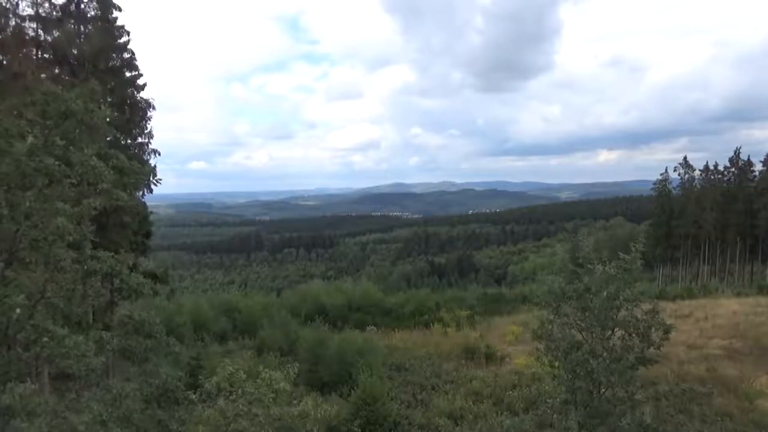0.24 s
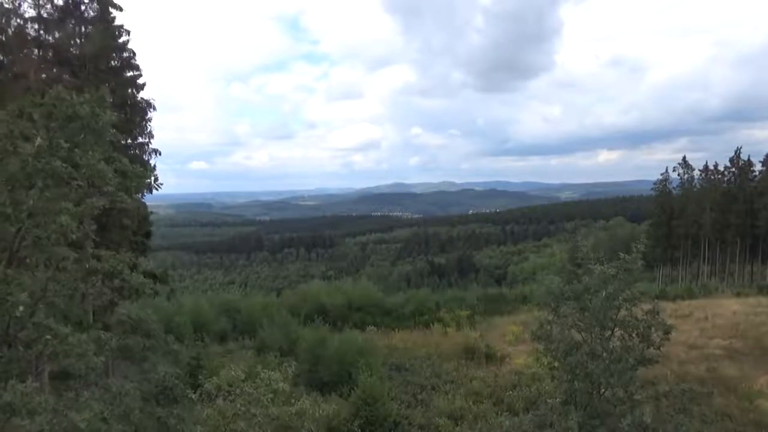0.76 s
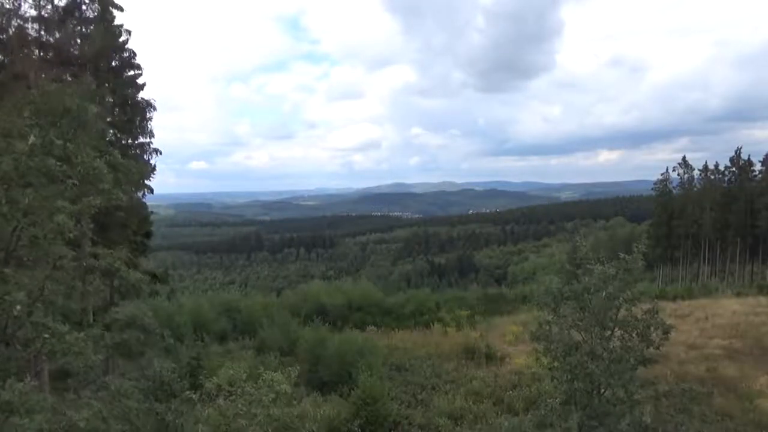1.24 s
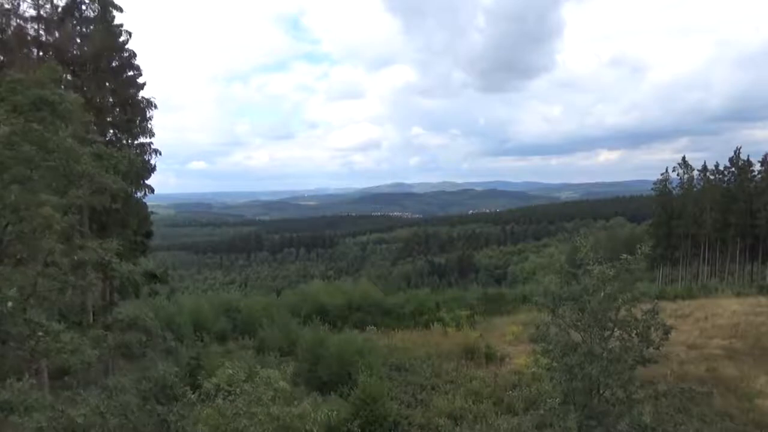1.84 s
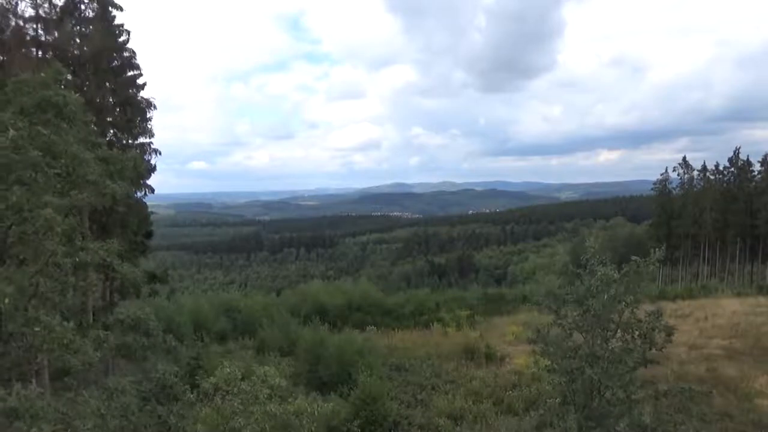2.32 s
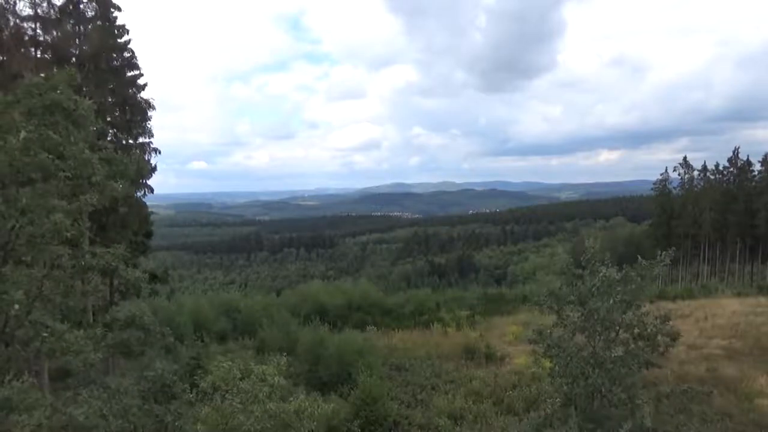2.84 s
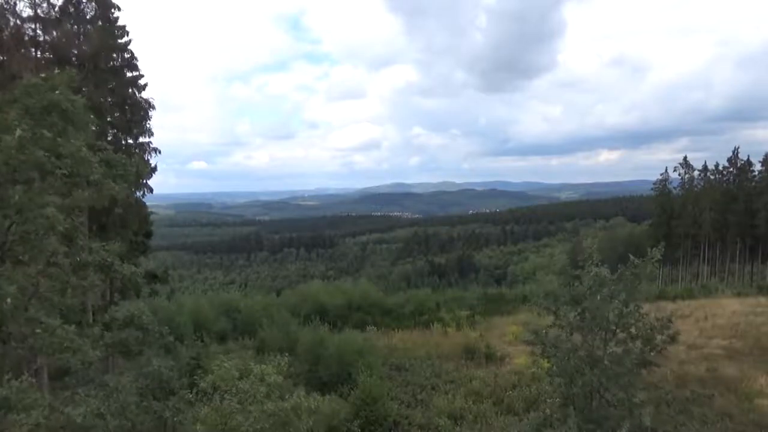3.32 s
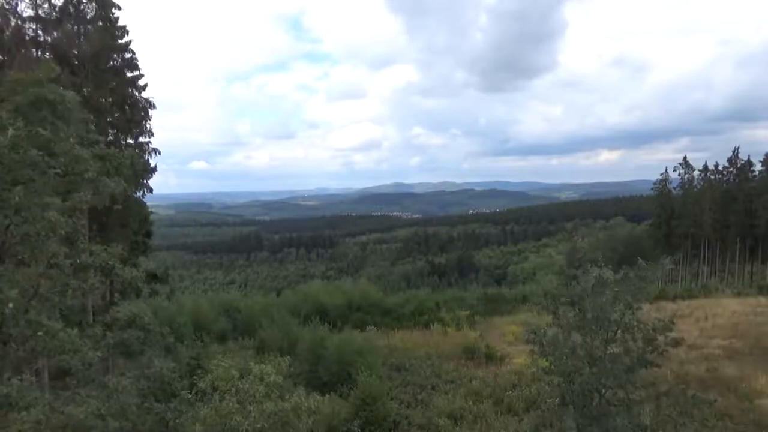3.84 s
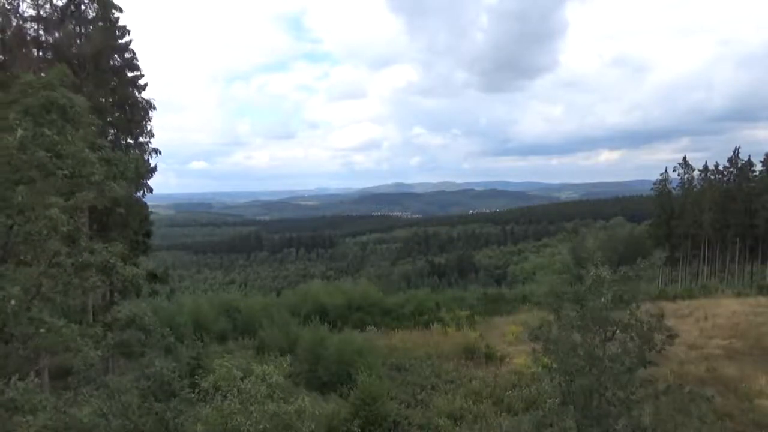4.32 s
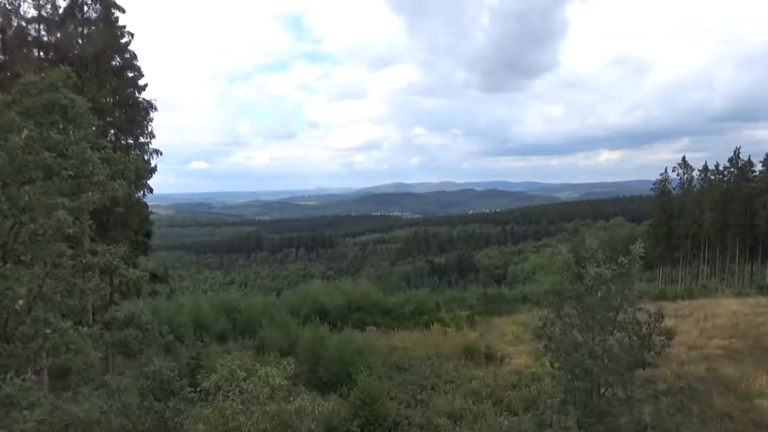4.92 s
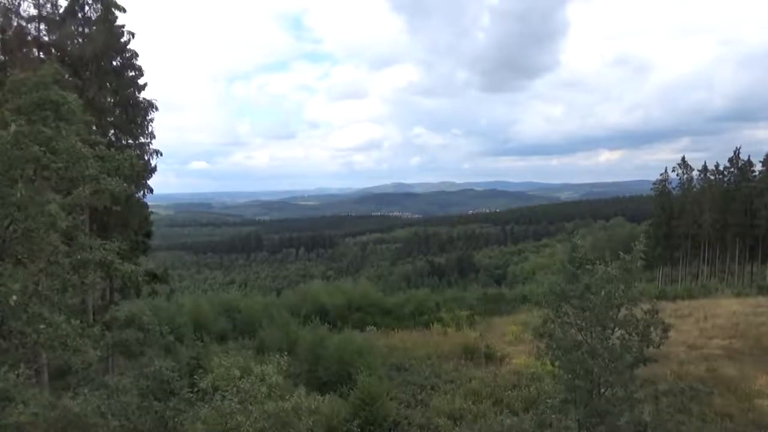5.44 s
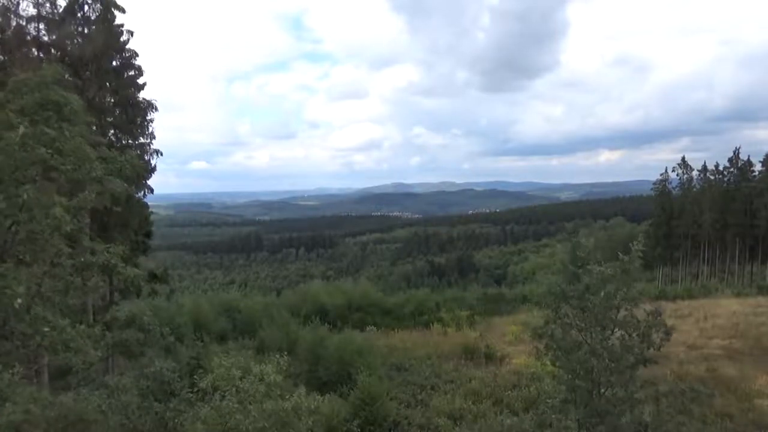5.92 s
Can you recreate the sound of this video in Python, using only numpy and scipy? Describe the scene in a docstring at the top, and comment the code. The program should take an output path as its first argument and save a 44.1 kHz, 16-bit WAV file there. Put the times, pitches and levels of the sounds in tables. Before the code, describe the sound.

Rough, low wind rumble hits in surges then lulls, over hissing leaves and distant forest, with faint upward bird chirps every second or so.

```python
"""Gusts on a wooded hillside buffet a camera's two microphones in several surges.
The buffeting is noise in bands whose gains follow the wind force; a slow, deep push swells once.
Behind it, filtered noise and tiny touches make rustling leaves, filtered noise the soft far forest.
Resonated noise bursts make ticking twigs; a swept sine with an echo makes a bird's rising whistle."""
import sys
import numpy as np
from scipy import signal
from scipy.fft import rfft, irfft, next_fast_len
from scipy.io import wavfile
from scipy.ndimage import uniform_filter1d

SR = 44100
rng = np.random.default_rng(int(sys.argv[2]) if len(sys.argv) > 2 else 0)


def generate_wav(signal):
    """Clip the signal to [-1, 1] and save it as 16-bit WAV at the path in sys.argv[1]."""
    frames = np.transpose(np.atleast_2d(signal))
    scaled = np.clip(frames, -1, 1) * 32767
    pcm = np.round(scaled).astype(np.int16)
    wavfile.write(sys.argv[1], SR, pcm)


N = 272538
TIME = np.arange(N) / SR


def amp(db):
    """Decibels to gain."""
    return 10 ** (np.asarray(db) / 20)


def unit(x):
    """Scales to rms 1."""
    return x / np.sqrt(np.mean(x ** 2) + 1e-20)


def curve(rows, axis=1):
    """One column of a time table at every sample."""
    rows = np.asarray(rows, float)
    return np.interp(TIME, rows[:, 0], rows[:, axis])


def read(points, hz):
    """A spectrum joined by straight lines on a log frequency axis."""
    point_hz, value = np.transpose(points)
    return np.interp(np.log(hz + 1), np.log(point_hz + 1), value)


def colour(x, points):
    """Causal minimum-phase filter with the given (Hz, dB) spectrum: it rings after each blow."""
    hz = abs(np.fft.fftfreq(8192, 1 / SR))
    log_gain = np.log(amp(read(points, hz)))
    response = np.exp(np.conj(signal.hilbert(log_gain)))
    taps = np.fft.ifft(response).real[:4096]
    return signal.oaconvolve(x, taps)[:N]


def wander(rate_hz):
    """Smooth random signal of rms 1, low-passed near the given rate."""
    size = next_fast_len(N)
    hz = np.fft.rfftfreq(size, 1 / SR)
    spectrum = rfft(rng.standard_normal(size)) / (1 + (hz / rate_hz) ** 4)
    return unit(irfft(spectrum, size)[:N])


def bands(x, centres_hz):
    """Splits x into overlapping bands that sum to x."""
    size = next_fast_len(N)
    spectrum = rfft(x, size)
    place = np.interp(np.fft.rfftfreq(size, 1 / SR), centres_hz, np.arange(len(centres_hz)))
    return [irfft(spectrum * np.maximum(1 - abs(place - k), 0), size)[:N]
            for k in range(len(centres_hz))]


def bell(centre_s, half_length_s):
    """A smooth bump of height 1 around the given moment."""
    return np.exp(-np.minimum(((TIME - centre_s) / half_length_s) ** 2, 60))


# Breeze between the gusts. Each row: time in seconds, force in dB.
BREEZE_FORCE = [(0, -25), (.4, -26), (.8, -24), (1.35, -22.5), (1.6, -33), (2.45, -38.5), (2.6, -49),
                (3.3, -36), (3.8, -29), (4.38, -40.5), (4.6, -60.5), (5.0, -53.5), (5.45, -46.5),
                (5.62, -56), (6.18, -55)]
# Gusts. Each row: start in seconds, length in seconds, force at mid-gust in dB.
GUST_EVENTS = [(0.163, 0.16, -22.5), (0.494, 0.3, -20), (1.008, 0.032, -21), (1.116, 0.15, -21.5),
               (1.376, 0.047, -25), (1.545, 0.084, -30.5), (1.975, 0.11, -34.5), (2.165, .05, -34),
               (2.812, 0.055, -37.5), (2.935, 0.017, -22.5), (3.05, 0.079, -18.5), (3.175, 0.2, -35),
               (3.549, .07, -26), (3.679, 0.063, -25.5), (3.805, 0.21, -28.5), (5.153, 0.084, -39),
               (5.754, 0.04, -36), (5.875, .15, -31)]
ATTACK_DB_PER_S, ARCH_DB, RELEASE_DB_PER_S = 390, 1.5, 351
# Brief lulls. Each row: centre in seconds, depth in dB.
SLACK_MOMENTS = [(0.031, 8), (1.525, 13), (1.865, 10), (2.905, 25), (3.46, 13), (4.187, 12), (4.255, 7),
                 (5.825, 7)]
LULL_HALF_S = 0.016


def wind_power():
    """Gust powers add to the breeze; each arches gently, and lulls let the air go slack."""
    power = amp(curve(BREEZE_FORCE)) ** 2
    for start_s, length_s, force_db in GUST_EVENTS:
        arch = (2 * np.clip((TIME - start_s) / length_s, 0, 1) - 1) ** 2
        before_s = np.maximum(start_s - TIME, 0)
        after_s = np.maximum(TIME - start_s - length_s, 0)
        below_db = ARCH_DB * arch + ATTACK_DB_PER_S * before_s + RELEASE_DB_PER_S * after_s
        power = power + amp(force_db - np.minimum(below_db, 100)) ** 2
    lull_db = sum(depth_db * bell(s, LULL_HALF_S) for s, depth_db in SLACK_MOMENTS)
    return power * amp(-lull_db) ** 2


# Hardest single eddies. Each row: centre in seconds, force in dB, half length in seconds,
# extra fineness in dB.
EDDY_PUFFS = [(0.139, -29, 0.0033, 4), (0.234, -15, 0.0029, -1.5), (0.397, -16.5, 0.0054, -10),
              (0.51, -15, 0.012, -6.5), (0.788, -21, .0018, 5), (1.59, -15.5, 0.0031, -3),
              (1.812, -34, .003, 2), (3.076, -22, 0.0067, 0), (3.125, -17, 0.0019, -5),
              (3.25, -23.5, 0.0073, -5.5), (3.345, -24.5, 0.0055, -0.5), (3.568, -19.5, 0.0023, 1),
              (3.798, -19, 0.0021, 3), (4.377, -35, .0037, 4), (5.16, -35, 0.0045, 0),
              (5.754, -32, 0.0065, 15), (5.794, -25, .0028, -10), (5.89, -28.5, .006, 7.5),
              (5.935, -19, 0.003, -3), (5.976, -22, 0.0044, 1)]
# How the air meets the camera. Each row: time in seconds, eddy fineness in dB,
# weight of the large eddies in dB.
AIR_FLOW = [(0, -0.5, 1), (.65, 3.5, -5.5), (1.2, 2, -6.5), (1.6, 2, 2), (2.1, 1.5, -0.5), (2.9, -3, -6.5),
            (3.1, 3.5, 3.5), (3.7, 1, -2.5), (4.3, -2, -1.5), (5.2, -2.5, 10.5), (5.9, 2, 11.5)]
# Microphone opening's answer to eddies. Each row: frequency in Hz, gain in dB.
PORT_RESPONSE = [(25, -49), (55, -31.5), (90, -18.5), (165, -3), (250, 0), (315, 5.5), (390, 3), (490, 0.5),
                 (690, -2), (880, -6), (1020, -4), (1500, -7.5), (3000, -13), (8000, -23.5)]
# Side the wind comes from. Each row: time in seconds, nominal left minus right of the rumble in dB.
WIND_LEAN = [(0, -.5), (.7, -.4), (1.7, -1.3), (2.3, -.9), (3.1, .2), (4.4, .2), (5.2, -2.5), (6.1, -2.1)]


def buffeting(gain_db=14.5, flutter_db=4.0, flutter_hz=100, steadying_per_db=0.069, corner_hz=490,
              growth=0.44, snaps_per_s=240, snap_db=3.5, large_hz=210):
    """Eddies beat on the microphones; harder wind makes them finer, so the noise reaches higher."""
    power, fine_db = wind_power(), curve(AIR_FLOW)
    for centre_s, puff_db, half_s, extra_db in EDDY_PUFFS:
        bump = bell(centre_s, half_s)
        power = power + amp(puff_db) ** 2 * bump
        fine_db = fine_db + extra_db * bump
    force_db = 10 * np.log10(power)

    # strong wind crowds the eddies into a steadier roar
    flutter = wander(flutter_hz)
    flutter = flutter - uniform_filter1d(flutter, size=1800)
    flutter_depth = np.clip(-0.5 - steadying_per_db * (force_db + 23.5), .4, 1.1)
    force_db = force_db + flutter_db * flutter * flutter_depth

    # very small eddies snap past within a millisecond or two
    snaps = (rng.random(N) < snaps_per_s / SR) * rng.exponential(1, N)
    snaps = np.minimum(signal.oaconvolve(snaps, np.hanning(SR // 400), "same"), 2)

    # turbulence falls off exponentially above the corner; large eddies weight the bottom
    corner_db = growth * (np.maximum(force_db, -42) + 21.5) + fine_db + snap_db * snaps
    corner = corner_hz * amp(corner_db)
    large_db = curve(AIR_FLOW, axis=2)
    centres_hz = np.geomspace(100, 8000, 16)
    gains = []
    for hz in centres_hz:
        large_share = 1 / (1 + (hz / large_hz) ** 4) - 0.25
        falloff = np.exp(np.minimum((300 - hz) / corner, 1.1))
        gains.append(amp(force_db + large_db * large_share) * falloff)

    def eddy_noise():
        parts = bands(rng.standard_normal(N), centres_hz)
        return colour(sum(gain * part for gain, part in zip(gains, parts)), PORT_RESPONSE)

    mid = eddy_noise()
    # mainly the low eddies differ a little between the microphones
    side = colour(eddy_noise(), [(250, -24), (650, -27), (1200, -38)])
    # the windward microphone gets more low rumble
    rumble = bands(mid, [350, 1200])[0]
    side = side + rumble * (amp(curve(WIND_LEAN) / 2) - 1)
    return amp(gain_db) * np.array([mid + side, mid - side])


PUSH_S, PUSH_DB, PUSH_RISE_DB_PER_S, PUSH_FALL_DB_PER_S = 5.07, -46.5, 100, 95


def push():
    """One large, slow eddy presses on both microphones: deep noise swells to a peak and fades."""
    rise_db = PUSH_RISE_DB_PER_S * (PUSH_S - TIME)
    fall_db = PUSH_FALL_DB_PER_S * (TIME - PUSH_S)
    spectrum = [(10, -27), (28, 8), (60, 8), (120, 1), (400, -45), (2000, -80)]  # Hz, dB
    noise = unit(colour(rng.standard_normal(N), spectrum))
    return amp(PUSH_DB - np.maximum(rise_db, fall_db)) * noise


# Channel likeness for leaves and forest. Each row: frequency in Hz, correlation from 0 to 1.
CHANNEL_LIKENESS = [(50, .99), (600, .995), (1200, .999), (4200, .999), (5600, .972), (7000, .97),
                    (10000, .972), (12000, .995)]


def spread(mid, other):
    """Leaves and forest sound almost the same in both channels; a faint second noise adds slight width."""
    hz, same = np.transpose(CHANNEL_LIKENESS)
    side_db = 10 * np.log10((1 - same) / (1 + same))
    side = colour(other, np.c_[hz, side_db])
    return np.array([mid + side, mid - side])


# Rustle of close leaves. Each row: time in seconds, level before gain_db in dB.
RUSTLE_LEVEL = [(0, -58.3), (1.6, -60.2), (2.3, -56.3), (3.9, -52.5), (4.6, -54), (6.2, -55.1)]
# Leaf spectrum. Each row: frequency in Hz, relative density in dB per Hz.
LEAF_SPECTRUM = [(800, -29), (2000, -4), (3200, -7.5), (4700, -7.5), (5400, -2.5), (6100, 1.5), (6900, -2),
                 (8000, -5.5), (11000, -7.5), (13000, -12), (15500, -19)]


def leaves(gain_db=2.0, touches_per_s=1200, size_spread_db=3.5, touch_db=-6):
    """Countless leaves brush into a hiss, the nearest as separate tiny touches."""
    def rustle():
        size_db = size_spread_db * np.minimum(rng.exponential(1, N), 5)
        sizes = amp(size_db) * rng.choice([-1, 1], N)
        touches = unit(sizes * (rng.random(N) < touches_per_s / SR))
        return unit(colour(rng.standard_normal(N) + amp(touch_db) * touches, LEAF_SPECTRUM))
    sway_db = .25 * wander(12)
    return amp(curve(RUSTLE_LEVEL) + gain_db + sway_db) * spread(rustle(), rustle())


# Twigs and dry leaves. Each row: start in seconds, level before gain_db in dB, pitch in Hz,
# decay time constant in seconds.
TWIG_TICKS = [(.731, -44.5, 6900, 0.0052), (4.697, -43.5, 8000, 0.0077), (5.129, -43, 11500, .003),
              (5.521, -51, 9500, .003), (5.982, -37, 10800, .002), (5.988, -44, 11500, .002),
              (5.994, -43, 11500, .002)]


def twigs(width_hz=1200, gain_db=-3):
    """Each tick is a brief scrape (decaying noise) that rings a small, stiff stalk (resonator)."""
    out, t = np.zeros(N), np.arange(2048) / SR
    for start_s, level_db, hz, decay_s in TWIG_TICKS:
        b, a = signal.iirpeak(hz, hz / width_hz, SR)
        ringing = unit(signal.lfilter(b, a, rng.standard_normal(len(t))))
        tick = ringing * np.exp(-t / decay_s)
        part = out[round(start_s * SR):][:len(t)]
        part += amp(level_db + gain_db) * tick[:len(part)]
    return out


# Bird calls. Each row: start in seconds, level in dB, length in seconds.
BIRD_CALLS = [(1.064, -56.5, .114), (2.427, -51, .124), (3.466, -48, .122), (4.515, -48.5, .123),
              (5.686, -55.5, .12)]
# Shape of one call. Each row: share of its length from 0 to 1, pitch before waver in Hz,
# relative level in dB.
CALL_SHAPE = [(0, 3690, -12), (.12, 3730, -5), (.3, 3870, -1), (.5, 4170, 0), (.68, 4450, -1),
              (.82, 4900, -5), (.9, 5050, -6), (1, 5000, -7)]


def bird(waver=0.0064, shimmer_db=0.5, echo_db=-11, echo_t60_s=0.51):
    """A pure whistle that sweeps upward, with a faint echo from the trees (decaying noise tail)."""
    share, pitch_hz, shape_db = np.transpose(CALL_SHAPE)
    drift, shimmer = 1 + waver * wander(110), shimmer_db * wander(70)
    song = np.zeros(N)
    for start_s, level_db, length_s in BIRD_CALLS:
        on = (TIME >= start_s) & (TIME < start_s + length_s)
        u = (TIME[on] - start_s) / length_s
        hz = np.interp(u, share, pitch_hz) * drift[on]
        tone = np.sqrt(2) * np.sin(2 * np.pi * np.cumsum(hz) / SR)
        gain = amp(level_db + np.interp(u, share, shape_db) + shimmer[on])
        song[on] += tone * gain * signal.windows.tukey(len(u), .08)
    t = TIME[:SR // 2]
    tail = rng.standard_normal(len(t)) * np.exp(-np.log(1000) * t / echo_t60_s)
    echo = signal.oaconvolve(song, tail / np.linalg.norm(tail))[:N]
    return song + amp(echo_db) * echo


# Roar of the far forest. Each row: time in seconds, level in dB.
ROAR_LEVEL = [(0, -48.5), (1.5, -55.5), (2.5, -52.5), (3.5, -52.5), (4.8, -51), (6.2, -51.5)]
# Forest spectrum. Each row: frequency in Hz, relative density in dB per Hz.
FOREST_SPECTRUM = [(25, -14), (80, -1.5), (170, -6.5), (300, -4), (430, 3), (800, 0.5), (1030, 1),
                   (1500, -3), (2200, -10.5), (4000, -16.5), (9000, -34.5)]


def forest():
    """Wind in far trees: noise dulled and smoothed by distance."""
    mid, other = (unit(colour(rng.standard_normal(N), FOREST_SPECTRUM)) for _ in range(2))
    sway_db = .35 * wander(4)
    return amp(curve(ROAR_LEVEL) + sway_db) * spread(mid, other)


def scene():
    """Wind on the microphones over the sounds of the hillside."""
    return buffeting() + push() + leaves() + twigs() + bird() + forest()


def record(dry, ceiling_db=-6.0, edge_hz=15750):
    """The recorder rounds off the hardest blows and cuts the band above the edge."""
    limited = dry / (1 + (dry / amp(ceiling_db)) ** 4) ** (1 / 4)
    lowpass = signal.firwin(511, edge_hz, window=("kaiser", 9), fs=SR)
    return signal.oaconvolve(limited, lowpass[None], "same")


dry = scene()
out = record(dry)
generate_wav(out)
```